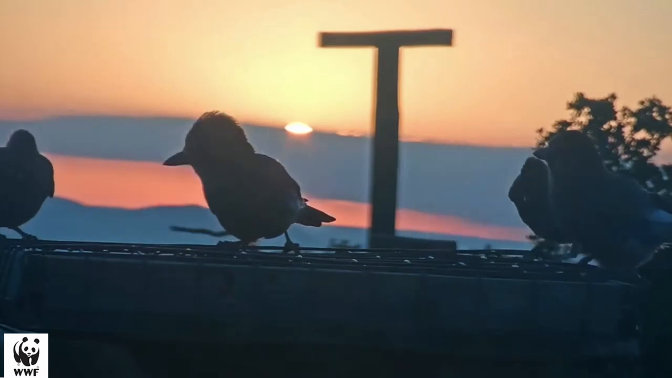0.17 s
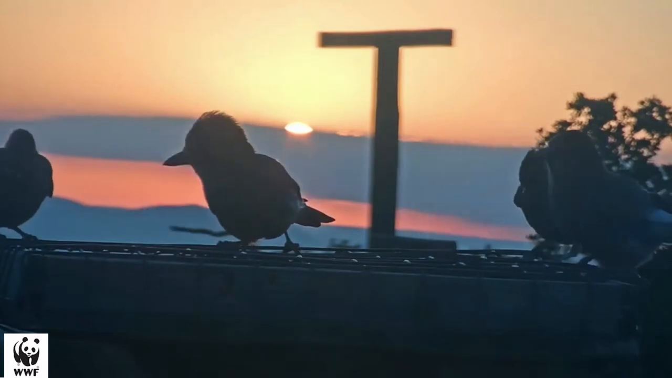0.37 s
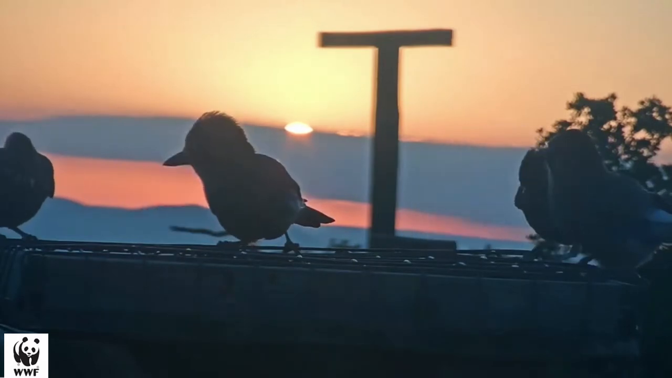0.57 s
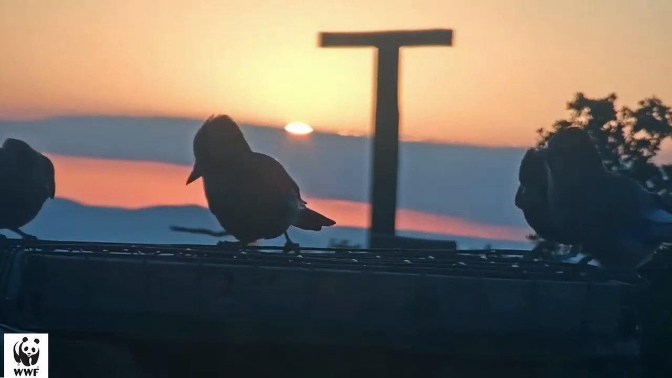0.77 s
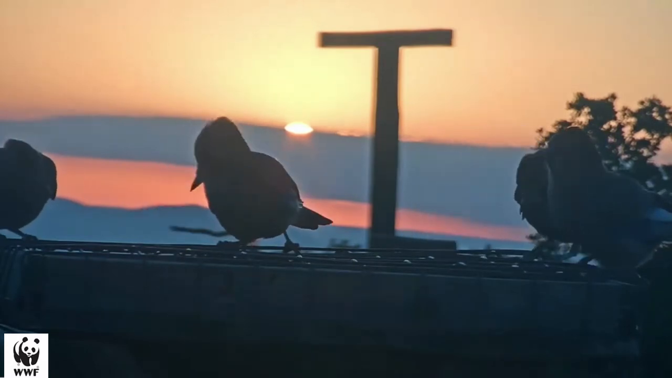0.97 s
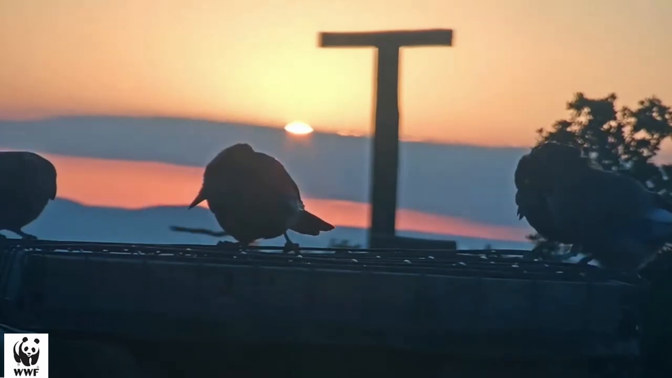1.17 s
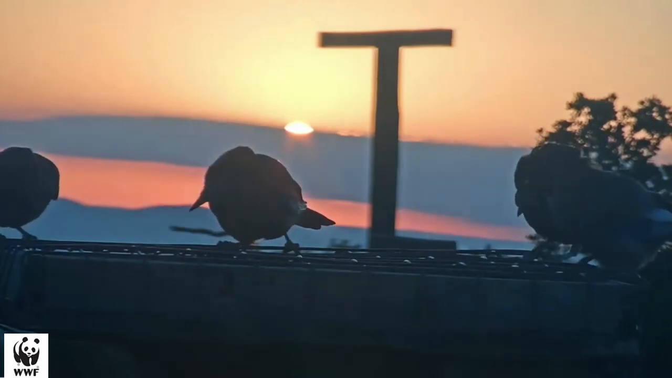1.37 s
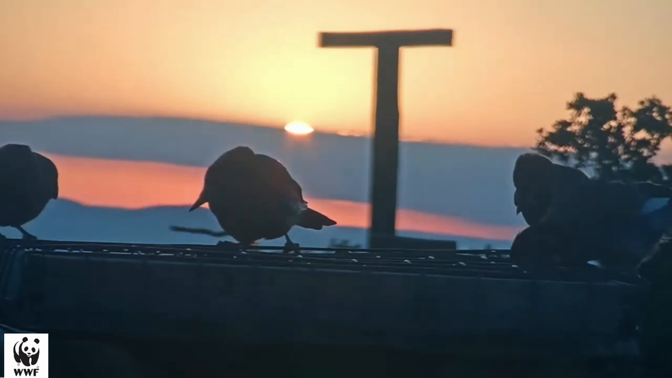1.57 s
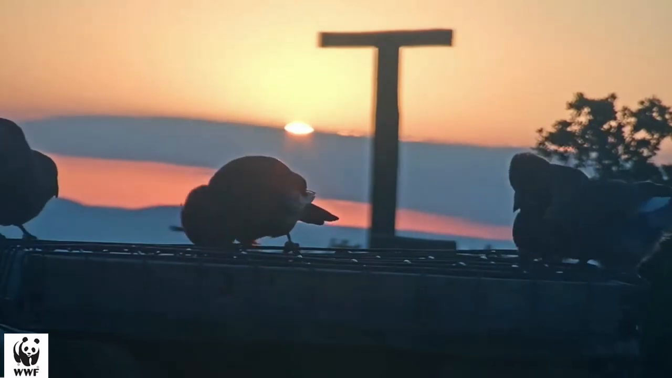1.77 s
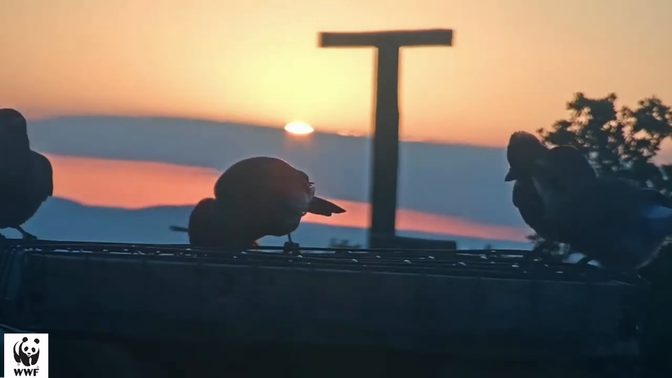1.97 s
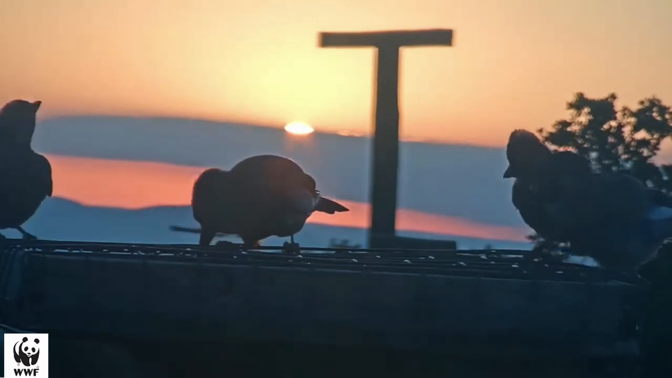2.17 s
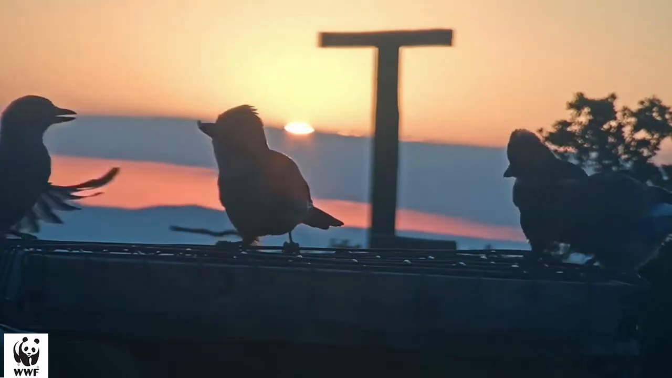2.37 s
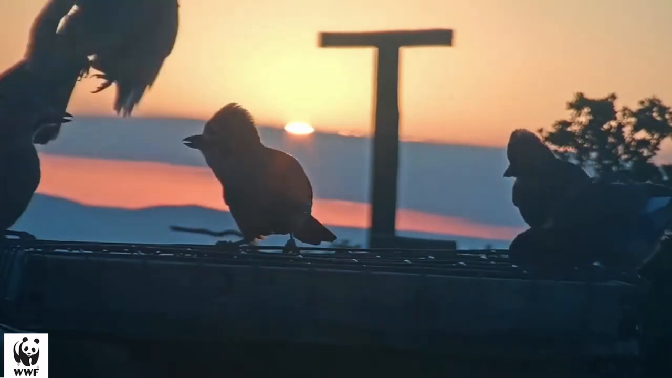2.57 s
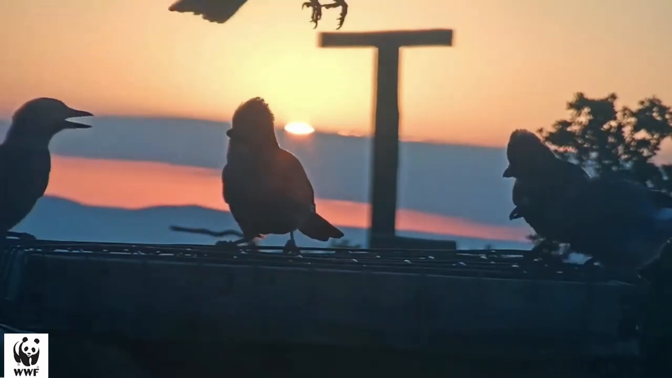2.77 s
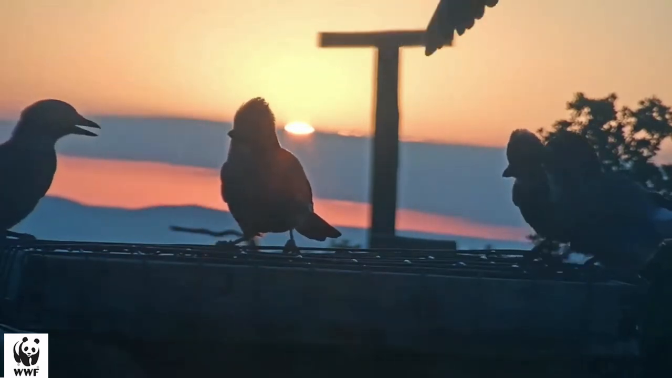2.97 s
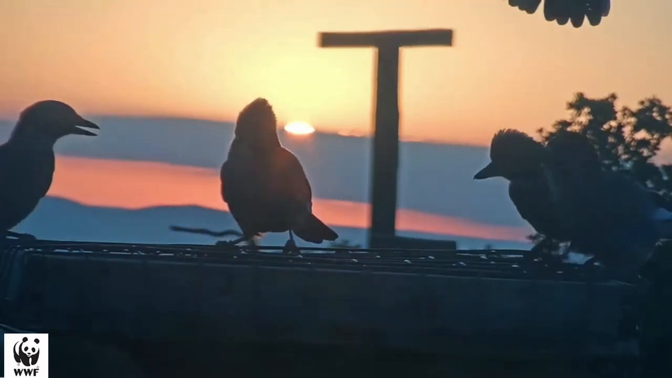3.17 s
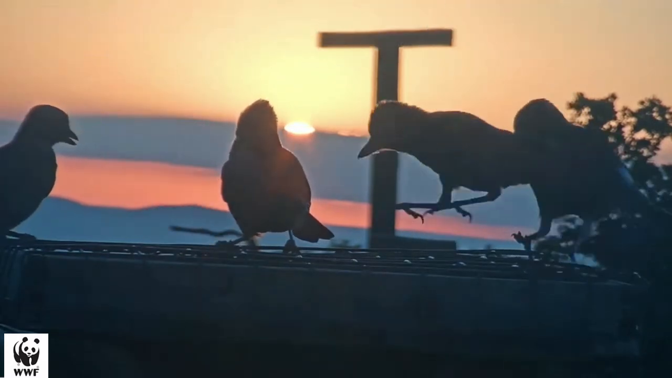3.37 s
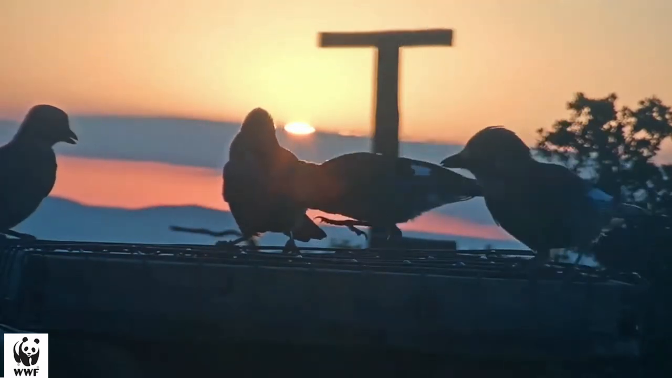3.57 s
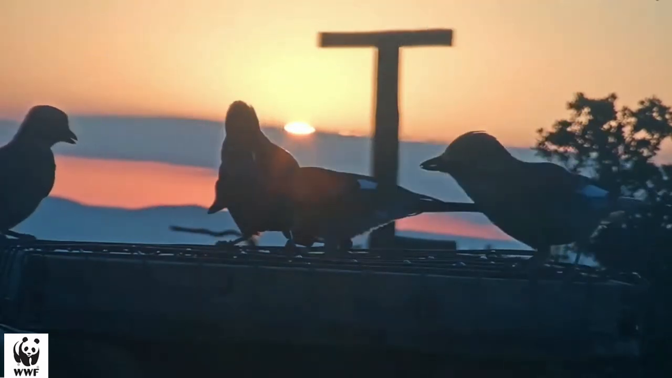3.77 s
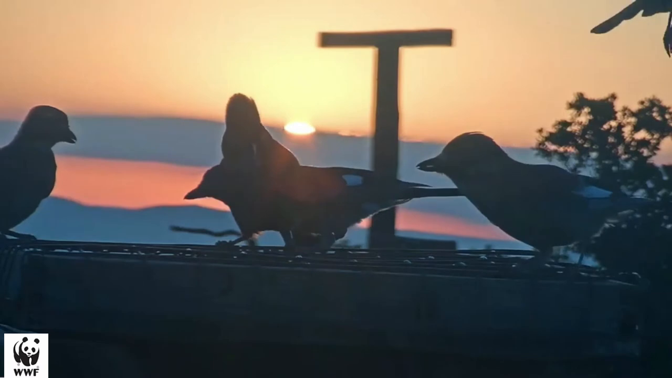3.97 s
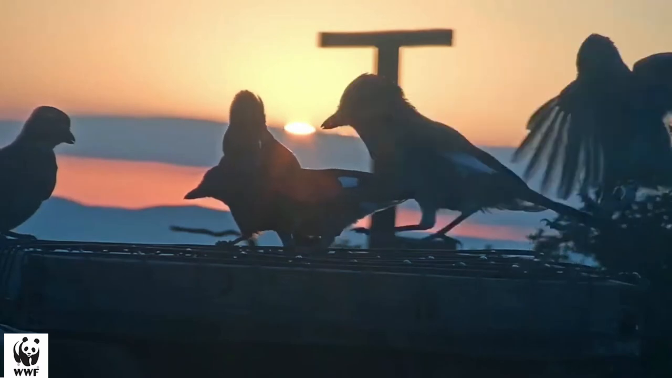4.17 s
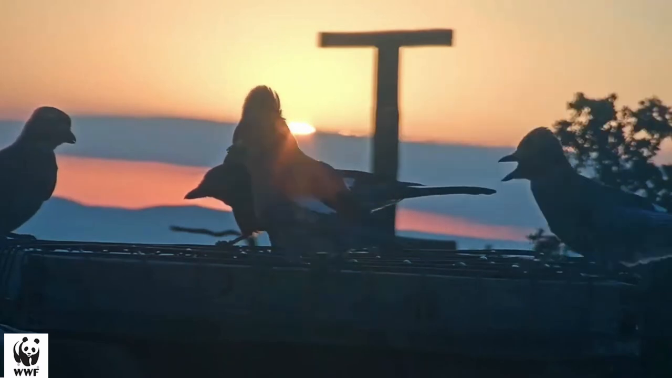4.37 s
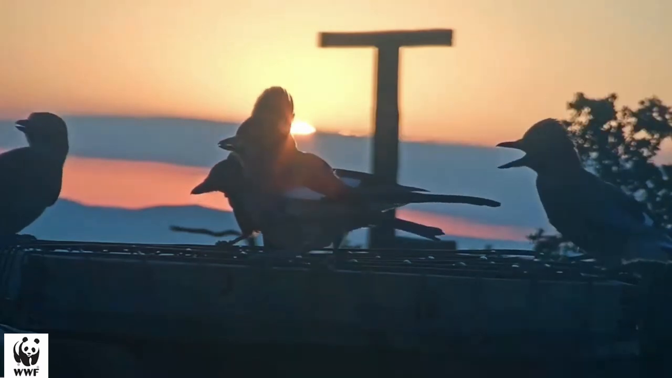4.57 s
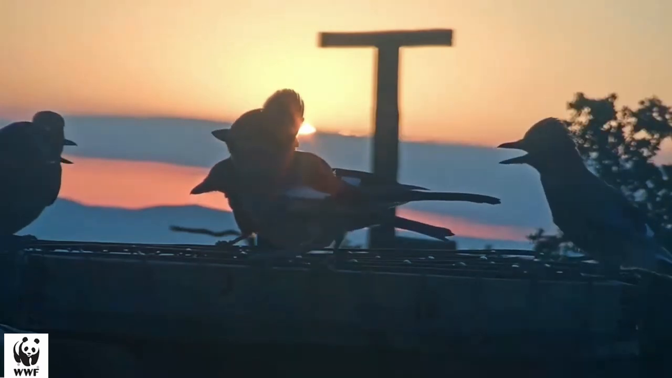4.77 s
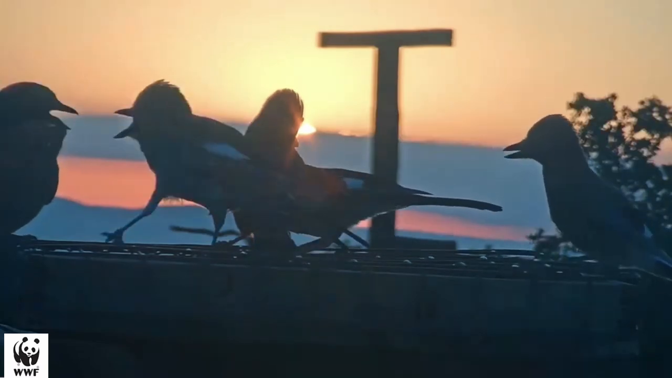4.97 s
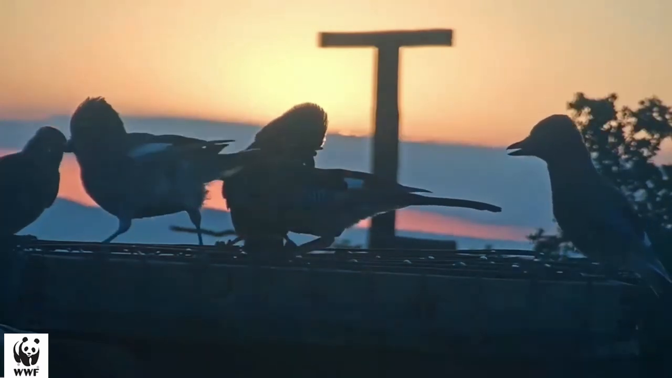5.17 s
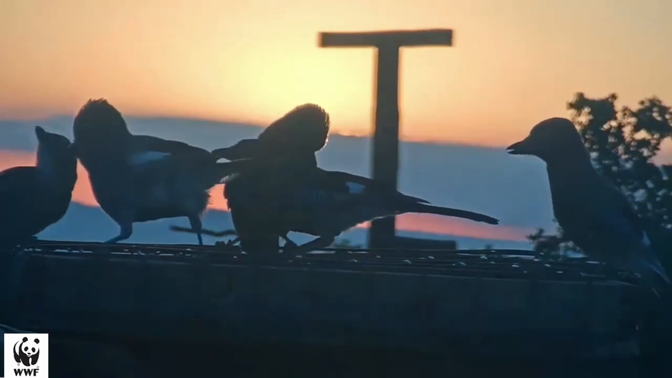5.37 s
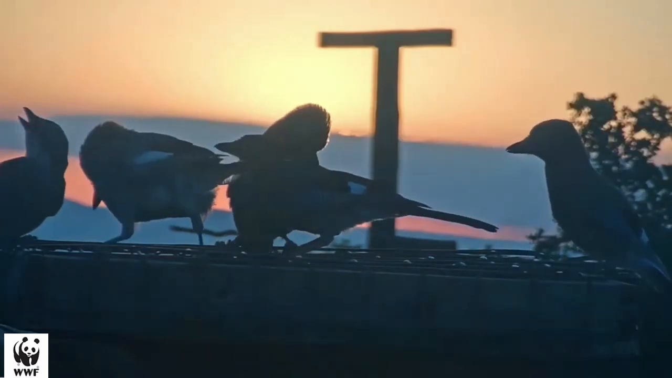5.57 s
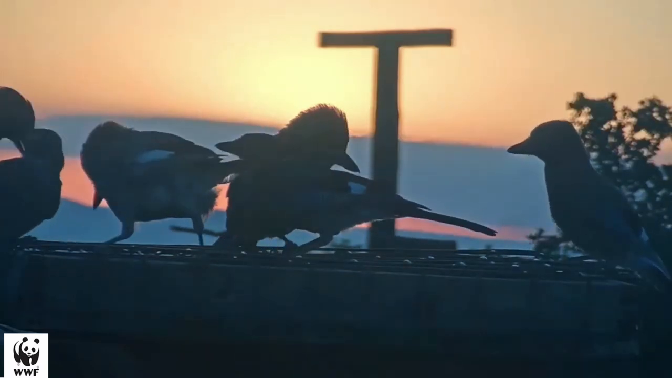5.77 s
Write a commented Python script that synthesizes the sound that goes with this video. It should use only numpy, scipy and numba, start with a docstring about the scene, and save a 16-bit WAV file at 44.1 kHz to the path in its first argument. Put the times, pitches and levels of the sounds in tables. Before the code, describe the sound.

Outdoors, an even, airy hiss and a weak distant low rumble run throughout. At 0 s a jay gives a soft, nasal, raspy squawk of about 0.2 s, sharper at its start; another quiet rasp swells at 1.1 s. At 2.1 s comes the first loud screech, 0.4 s long, a harsh, tearing rush of noise around 3 to 5 kHz that grows and breaks rougher midway. More screeches follow at 2.6, 3.05 (the loudest, with a scuff and soft tail near 3.4), 4.1 and 4.75 s, each about 0.3 s, grating and slightly buzzy. Short soft nasal rasps sit between at 3.55 and 3.8 s. Around 5.1 to 5.25 s there are tiny scuffs, a brief croak and one hard, dry tap on the table. A very short, clearer squawk starts at 5.74 s. Close, dry, mono, with limited treble and faint board reflections.

```python
"""Jays squabble on a feeding table at dawn: soft, nasal rasps, then loud harsh screeches with rasps in between.
Each call is turbulent air, chopped by the syrinx and shaped by throat resonances; in the screeches
they move with the bill and the breaking voice. Bills and claws tap on the table, short noise bursts
scuff it or sharpen an early squawk, and its boards echo. Behind is an outdoor hiss and a low distant
rumble, all heard through a narrow-band camera microphone."""
import sys
import numpy as np
from scipy import signal
from scipy.fft import rfft, irfft, next_fast_len
from scipy.io import wavfile
from scipy.ndimage import uniform_filter1d, map_coordinates
from numba import njit

SR = 44100
rng = np.random.default_rng(int(sys.argv[2]) if len(sys.argv) > 2 else 0)


def wav_out(sig):
    """Save sig, one row per channel (or a flat mono array), as 16-bit PCM at SR to the path in sys.argv[1]."""
    wavfile.write(sys.argv[1], SR, np.round(np.clip(np.atleast_2d(sig).T, -1, 1) * 32767).astype(np.int16))


N = 256220  # samples

# The loud screeches on the table, one row each:
# [start t/s, length t/s, pulse rate f/Hz, regularity 0-1, rise of main resonance t/s, break at t/s,
#  break scale t/s, strain after the break 0-1, widest gape at t/s, gape half-length t/s, low lift f/Hz]
# The fourth breaks before it starts, the last would break only after it ends.
SCREECH_CALLS = [ (2.08, .41, 150, 0, 0.097, 2.29, 0.039, 0.36, 2.072, 0.15, 810),
                 (2.595, .295, 132, 0.2, 0.0044, 2.70, 0.029, 0.68, 2.665, 0.042, 225),
                 (3.048, 0.33, 131.3, 0.4, .004, 3.19, 0.025, 0.52, 3.16, .1, 520),
                 (4.083, 0.32, 134, 0.1, 0.013, 3.98, 0.032, 0.64, 4.14, 0.099, 250),
                 (4.743, .342, 133.9, .6, .004, 4.9, 0.063, 0.7, 4.9, 0.044, 120),
                 (5.736, 0.074, 136, 0.87, 0.046, 6, .03, .5, 5.78, .1, 8.2), ]
# The throat in each screech; levels are relative to the main resonance before strain and flare:
# [main f/Hz, broken main f/Hz, third f/Hz, broken third f/Hz, fourth f/Hz, low width f/Hz,
#  third width before strain f/Hz, low level/dB, octave level/dB, third level/dB, fourth level/dB,
#  rush level/dB, lowest of the rush f/Hz]
SCREECH_THROATS = [ (3490, 3230, 4450, 4800, 5400, 340, 1260, -9, -9, -13.5, -16.5, 3.5, 3000),
                   (3245, 3360, 5300, 4700, 6800, 280, 850, -7.5, -7, -9, -18, -0.5, 3030),
                   (3260, 3330, 5190, 5340, 7050, 810, 830, -12.5, -9.5, -6.5, -14.5, 1, 850),
                   (3500, 3600, 5130, 5130, 6200, 540, 650, -7, -4.5, -5, -10.5, -1.5, 2100),
                   (3320, 3430, 5460, 5550, 6400, 570, 900, -7.5, -14, -7.5, -15.5, 2.5, 2350),
                   (3140, 2600, 5450, 8900, 6900, 640, 1100, -3, -12, -9, -25.5, 4, 1900), ]
# Effort through each screech, one list of points per call: [t/s, level/dB]
SCREECH_EFFORT = [
    [(2.08, -42.0), (2.088, -34), (2.206, -17.5), (2.315, -15.5), (2.332, -20.5), (2.389, -13.5),
     (2.458, -13.0), (2.47, -19), (2.49, -41.5)],
    [(2.595, -40), (2.607, -25), (2.648, -19), (2.706, -15.5), (2.755, -21.5), (2.857, -20), (2.882, -35),
     (2.89, -41)],
    [(3.048, -44), (3.06, -26.5), (3.113, -17.5), (3.166, -20), (3.195, -12.0), (3.264, -14.5),
     (3.285, -21), (3.313, -13.5), (3.325, -17.5), (3.374, -13.5), (3.415, -34)],
    [(4.085, -41), (4.101, -27.0), (4.126, -22), (4.265, -15), (4.298, -19), (4.347, -16.5), (4.38, -22.5),
     (4.4, -36.5)],
    [(4.743, -32), (4.755, -25), (4.906, -16.5), (4.918, -20.5), (4.947, -16), (4.963, -21.0), (5.056, -18),
     (5.069, -22.5), (5.085, -35.0)],
    [(5.735, -35), (5.761, -27.0), (5.805, -19.5)],
]
# Spectrum of the air rushing through the open bill: [f/Hz, relative level/dB]
BILL_RUSH = [(700, -40.5), (1100, -5.5), (1600, -4), (2100, 0.5), (2800, 2.5), (4000, 4), (4400, 1),
             (4800, -0.5), (5800, -6.5), (6500, -11), (7300, -26), (8000, -41), (9000, -50)]
CLEAR_STRAIN = 0.13  # strain before the break (0-1)
PULSING_LOST = 0.55  # share of the regularity that goes in the break
FLARE_DB, FLARE_S = 7.5, 0.013  # the upper resonances flare as the voice breaks
LOW_REST_HZ, LOW_SINK_HZ = 1496, 30  # low resonance with the bill nearly shut; its sink in the break
LOW_GROWS_DB_PER_S = 5.5  # the low resonance gains on the others through a call
OCTAVE_WIDTH_HZ = 360  # the low resonance's octave, heard while the bill gapes


def screeches():
    """Loud calls, most breaking midway (one is broken from the start, the short last one stays clear).

    Strain widens the main and third resonances and adds a rush of air."""
    out = np.zeros(N)
    for call, voice, effort in zip(SCREECH_CALLS, SCREECH_THROATS, SCREECH_EFFORT):
        (start, length, pulse_hz, regular, speak_s, break_at, break_s,
         full_strain, gape_at, gape_s, lift_hz) = call
        (main_from, main_to, third_from, third_to, fourth_hz, low_width_hz, third_width_hz,
         low_db, octave_db, third_db, fourth_db, rush_db, rush_hz) = voice
        t, gate = call_times(start, length)

        # how the bill and the voice move
        broken = (1 + np.tanh((t - break_at) / break_s)) / 2
        strain = np.clip(CLEAR_STRAIN + (full_strain - CLEAR_STRAIN) * broken, 0, 1)
        gape = bell(t, gape_at, gape_s)
        flare = amp(FLARE_DB * bell(t, break_at, FLARE_S))
        low_hz = LOW_REST_HZ + lift_hz * gape - LOW_SINK_HZ * broken
        main_hz = main_from + (main_to - main_from) * broken
        third_hz = third_from + (third_to - third_from) * broken
        main_width_hz = 350 + 600 * strain
        strained_third_width_hz = third_width_hz * (0.8 + 0.44 * strain)

        # the same puffs drive two independent noises: throat air and spray for the rush
        puffs = syrinx(len(t), pulse_hz, regular * (1 - PULSING_LOST * broken))
        air, spray = puffs * rng.standard_normal((2, len(t)))

        low_gain = amp(low_db + LOW_GROWS_DB_PER_S * (t - start))
        main_gain = (1 - bell(t, start, speak_s)) * np.sqrt(1 - strain ** 2)
        fourth_gain = amp(fourth_db) * flare * (0.84 + 0.43 * strain)
        layers = [  # (gain, sound): low, its octave, main, third, fourth, rush
            (low_gain, throat(air, low_hz, low_width_hz, core_db=-11.5)),
            (amp(octave_db) * gape, throat(air, 2 * low_hz, OCTAVE_WIDTH_HZ, core_db=-6)),
            (main_gain, throat(air, main_hz, main_width_hz, core_db=-11.5)),
            (amp(third_db) * flare, throat(air, third_hz, strained_third_width_hz, core_db=-11.5)),
            (fourth_gain, resonance(air, fourth_hz, width_hz=1430)),
            (amp(rush_db) * strain, unit(band(coloured(spray, BILL_RUSH), rush_hz))),
        ]
        total = sum(gain * sound for gain, sound in layers)
        total_gain = np.sqrt(sum(gain ** 2 for gain, _ in layers))
        loudness = amp(curves(effort, t)[0] - 0.06)
        add(out, t[0], gate * loudness * steadied(total / total_gain))
    return band(out, low_hz=1108)


# Soft calls, and the short soft tail of the third screech (at 3.385 s), one row each:
# [start t/s, length t/s, attack t/s, level/dB, fade after the attack dB/s, nasal f/Hz,
#  nasal glide Hz/s, level of all upper resonances/dB]
SOFT_RASPS = [ (0.0, .21, 0.019, -33, 7, 1490, -100, -3.5),
              (0.033, 0.063, 0.011, -29.5, 70, 1430, -500, -1), (1.084, .25, .04, -34, -3, 1356, 250, 2),
              (3.385, 0.037, 0.0054, -29.5, 152, 1390, 2, 6.5),
              (3.557, 0.11, 0.029, -31.5, 120, 1335, -1, -1.5),
              (3.766, 0.034, 0.012, -32.5, 150, 1320, -500, -0.5),
              (3.819, 0.074, 0.039, -38.5, 20, 1250, -700, -9),
              (5.181, 0.071, .008, -29.5, 140, 1355, 0, -1.5), ]
# Upper resonances of the half-open bill: [f/Hz, width f/Hz, level within the group/dB]
HALF_OPEN_BILL = [(2490, 350, -5.5), (3090, 250, -6), (3960, 550, -6.5), (5830, 930, -6.5),
                  (6670, 560, -15)]
RASP_RELEASE_S = 0.02


def soft_rasps():
    """Soft voice through a half-open bill: a narrow nasal resonance under a group of upper ones."""
    out = np.zeros(N)
    for start, length, attack_s, db, fade, hz, glide, bright_db in SOFT_RASPS:
        t = np.arange(0, length, 1 / SR)
        ramps = np.clip(np.minimum(t / attack_s, (length - t) / RASP_RELEASE_S), 0, 1)
        envelope = ramps * amp(db - fade * np.maximum(t - attack_s, 0))
        air = syrinx(len(t), pulse_hz=129.0, regular=0.14) * rng.standard_normal(len(t))
        nasal = throat(air, hz + glide * t, width_hz=340, core_db=-5.5, core_hz=55)
        upper = sum(amp(level) * throat(air, centre, width, core_db=-10)
                    for centre, width, level in HALF_OPEN_BILL)
        add(out, start, envelope * steadied(nasal + amp(bright_db) * upper))
    return band(out, low_hz=940)


def syrinx(size, pulse_hz, regular, jitter=0.054, flutter_db=1.0):
    """Puffs that gate turbulent air and flutter in strength; the less regular, the shallower."""
    regular = np.clip(regular, 0, 1)
    phase = 2 * np.pi * np.cumsum(pulse_hz * (1 + jitter * wobble(70, size))) / SR
    puffs = unit(np.exp(regular * np.cos(phase)))
    return puffs * amp(flutter_db * regular * wobble(350, size))


def throat(x, hz, width_hz, core_db, core_hz=110):
    """A throat resonance: a narrow, almost whistled core that wavers inside a wide band."""
    waver = 1 + 0.02 * wobble(50, len(x))
    core = resonance(x, hz * waver, core_hz)
    core = unit(core / (np.abs(signal.hilbert(core)) + 0.3))  # the oscillation saturates
    return unit(resonance(x, hz, width_hz) + amp(core_db) * core)


# Air pressure holds the loudness of a call: over how long, how firmly (0-1)
STEADY_S, STEADINESS = 0.023, 0.35


def steadied(x):
    """x at rms 1, its chance swells and sags partly evened out."""
    power = np.abs(uniform_filter1d(x ** 2, max(round(STEADY_S * SR), 1)))
    return unit(x / (np.sqrt(power) + 1e-6) ** np.clip(STEADINESS, 0, 1))


# Bills and claws touching the table: [t/s, peak level before the bass cut/dB]
TABLE_TAPS = [(5.205, -18), (5.2401, -2), (5.254, -24)]
# Ringing modes of one tap: [f/Hz, relative level/dB, t60 t/s]
TAP_RINGING = [(1330, -29, 0.0086), (2360, -9.5, 0.015), (3050, 3.5, 0.0039), (3270, -1.5, 0.0045),
               (5280, -2.5, 0.0056), (6900, -41, 0.0022)]


def taps():
    """Hard, dry contacts: decaying modes that ring for a few milliseconds."""
    out, t = np.zeros(N), np.arange(SR // 20) / SR
    click = sum(amp(db - 60 * t / t60) * np.sin(2 * np.pi * hz * t) for hz, db, t60 in TAP_RINGING)
    click *= 1 - np.exp(-t / .0001)  # soften the onset
    for s, db in TABLE_TAPS:
        add(out, s, amp(db) * click / np.abs(click).max())
    return out


# Short noise bursts: scuffs on the table, and a 3 kHz burst (second row) within the early squawk:
# [centre t/s (0.1 at the earliest, see add), length t/s, level/dB, centre f/Hz, width f/Hz]
NOISE_BURSTS = [(.055, 0.013, -49, 1260, 400), (.063, 0.025, -35, 3020, 500), (0.332, .06, -49, 6000, 1800),
                (3.368, 0.024, -22.5, 1600, 1700), (3.956, .03, -51, 3480, 3020),
                (4.415, .012, -30, 4200, 3030), (4.438, 0.037, -42, 4000, 2980),
                (4.697, 0.033, -43.5, 4980, 3000), (5.111, 0.0071, -37.5, 6200, 1500),
                (5.134, 0.0049, -28.5, 1430, 594), (5.189, 0.0058, -24, 1170, 397),
                (5.19, 0.014, -41, 6000, 250), (5.36, 0.032, -41, 5000, 2980)]


def noise_bursts():
    """Short swells of noise, each in its own resonant band."""
    out, t = np.zeros(N), np.arange(-SR // 10, SR // 10) / SR
    for s, length, db, hz, width in NOISE_BURSTS:
        swell = amp(db) * np.exp(-2 * (t / length) ** 2)
        add(out, s + t[0], swell * resonance(rng.standard_normal(len(t)), hz, width))
    return out


# Reflections off the table and its frame: [delay t/s, level/dB]
BOARD_REFLECTIONS = [(.0028, -27), (.0045, -20.5), (.0071, -14)]


def table_echo(x, wet_db=-19, t60=0.035):
    """The boards reflect the sound, and the surroundings scatter a short, weak tail."""
    t = np.arange(SR // 8) / SR
    tail = rng.standard_normal(len(t)) * amp(-60 * t / t60) * (1 - np.exp(-t / 0.0007))
    response = amp(wet_db) * tail / np.linalg.norm(tail)
    for delay, db in BOARD_REFLECTIONS:
        add(response, delay, amp([db]))
    return x + signal.fftconvolve(x, response)[:N]


# Spectrum of the outdoor hiss: [f/Hz, relative level per Hz/dB]
OUTDOOR_HISS = [(440, -36), (750, -21.5), (858, -14.5), (991, -6.5), (1100, -6), (1170, -5), (1390, -3),
                (1510, -5.5), (2360, -6), (2840, -1), (3870, -4), (6290, -14), (7190, -22), (8140, -28.5),
                (8840, -21.5), (11500, -96), (19400, -120)]
# Spectrum of the distant rumble: [f/Hz, relative level per Hz/dB]
FAR_RUMBLE = [(25, -54.5), (50, -48.5), (80, -27.5), (120, -16.5), (160, -7), (210, -1.5), (330, -3),
              (450, -7), (600, -14), (800, -20.5), (1200, -49.5), (2500, -80.5)]
RUMBLE_SWAY_DB = 0.9
# The background dips briefly after the loudest screech: centre, half-length, depth
DIP_S, DIP_LENGTH_S, DIP_DB = 3.45, .11, -2.5


def outdoors():
    """Nearly even hiss above a low, far rumble: two shaped noises whose levels sway a little."""
    hiss = amp(-37.0 + 0.2 * wobble(7.9, N)) * coloured(rng.standard_normal(N), OUTDOOR_HISS)
    rumble_level = amp(-41.5 + RUMBLE_SWAY_DB * wobble(5.92, N))
    rumble = rumble_level * coloured(rng.standard_normal(N), FAR_RUMBLE)
    dip = amp(DIP_DB * bell(np.arange(N) / SR, DIP_S, DIP_LENGTH_S))
    return dip * (hiss + rumble)


def amp(db):
    """Decibels to gain."""
    return 10 ** (np.asarray(db) / 20)


def unit(x):
    """x at rms 1."""
    return x / np.sqrt(np.mean(x ** 2) + 1e-20)


def curves(rows, t):
    """Each column after the first, read at times t."""
    s, *cols = np.transpose(rows)
    return [np.interp(t, s, c) for c in cols]


def bell(t, centre, length):
    """A smooth bump of height 1, down to 1/e at length from its centre."""
    return np.exp(-((t - centre) / length) ** 2)


def wobble(rate, size):
    """A smooth random curve with rate knots a second."""
    return map_coordinates(rng.standard_normal(4096), [np.arange(size) * rate / SR], mode="wrap")


def coloured(x, points):
    """x through a spectrum of (Hz, dB) points, at rms 1."""
    m = next_fast_len(len(x) + 8192)
    hz, db = np.transpose(points)
    gain = amp(np.interp(np.log(np.fft.rfftfreq(m, 1 / SR) + 1), np.log(hz), db))
    return unit(irfft(rfft(x, m) * gain, m)[:len(x)])


def resonance(x, hz, width_hz):
    """x through a steep resonance whose centre and width may move, at rms 1."""
    damping = 2 * np.pi * np.abs(width_hz) / SR + np.zeros(len(x))
    drive = x * damping ** 2.5  # the same power at every width
    return unit(ring(drive, np.exp(2j * np.pi * hz / SR - damping)))


@njit
def ring(x, pole):
    """Three equal complex resonators in a row, their pole moving sample by sample."""
    y, a, b, c = np.zeros(len(x)), 0j, 0j, 0j
    for i in range(len(x)):
        a = pole[i] * a + x[i]
        b = pole[i] * b + a
        c = pole[i] * c + b
        y[i] = c.real
    return y


def band(x, low_hz, high_hz=7700):
    """Band limits: a small bird radiates almost nothing below or above its resonances."""
    x = signal.sosfilt(signal.butter(8, low_hz, "highpass", fs=SR, output="sos"), x)
    return signal.sosfilt(signal.butter(5, high_hz, fs=SR, output="sos"), x)


def add(track, s, sound):
    """Mix a sound into the track from time s; a start before 0 is moved to 0."""
    part = track[max(round(s * SR), 0):][:len(sound)]
    part += sound[:len(part)]


def call_times(start, length):
    """Sample times of a call, and a gate that opens and shuts it softly."""
    t = np.arange(start, start + length, 1 / SR)
    return t, np.clip(np.minimum(t - t[0], t[-1] - t) / 0.0035, 0, 1)


def scene():
    """The birds on their table in the open air; taps and noise bursts carry no bass."""
    calls = screeches() + soft_rasps()
    bass_cut = signal.butter(2, 700, "highpass", fs=SR, output="sos")
    short_sounds = signal.sosfilt(bass_cut, taps()) + band(noise_bursts(), low_hz=850)
    return (table_echo(calls + short_sounds) + outdoors())[None]


TOP_HZ = 8990  # nothing passes the microphone from here up


def record(dry, knee_hz=7600):
    """A narrow-band camera microphone: peaks round off, and the treble rolls away to a hard limit."""
    x = dry / (1 + np.abs(dry) ** 8) ** (1 / 8)
    m = next_fast_len(N + SR // 4)
    hz = np.fft.rfftfreq(m, 1 / SR)
    response = (hz < TOP_HZ) / np.sqrt(1 + (hz / knee_hz) ** 30)
    return irfft(rfft(x, m) * response, m)[..., :N]


dry = scene()
out = record(dry)
wav_out(out)
```